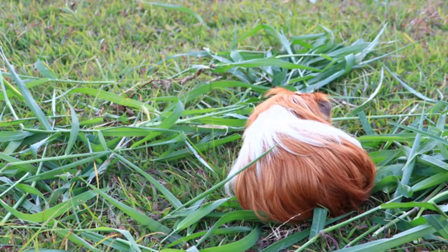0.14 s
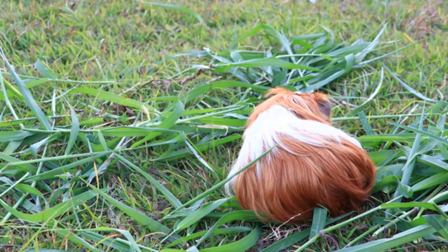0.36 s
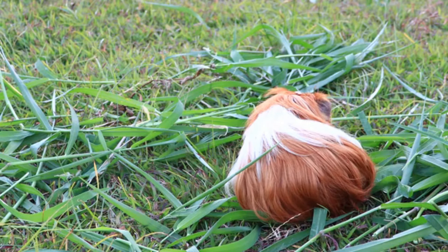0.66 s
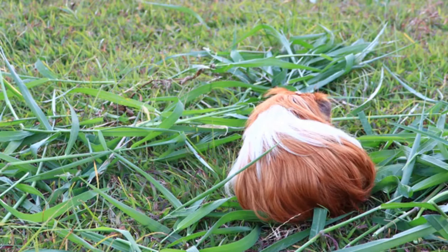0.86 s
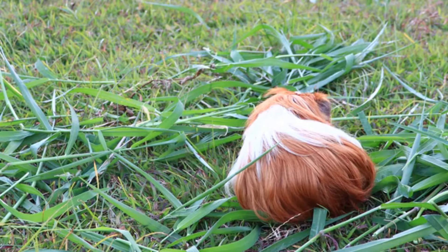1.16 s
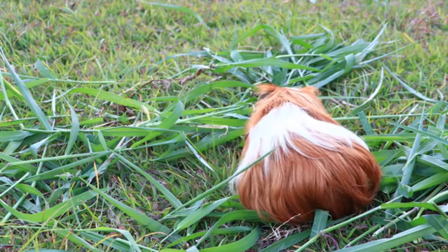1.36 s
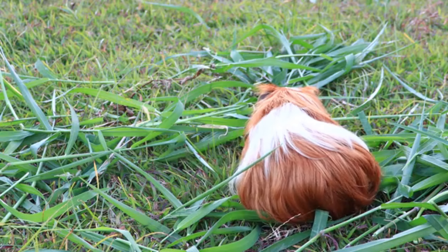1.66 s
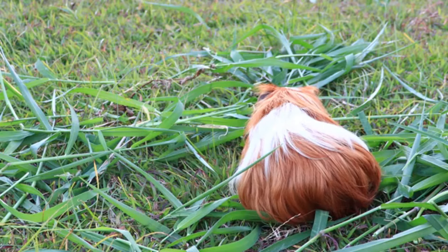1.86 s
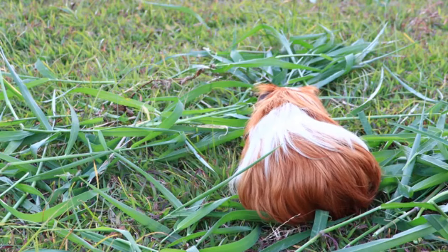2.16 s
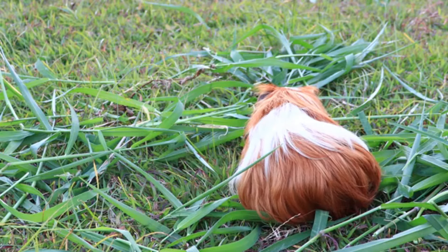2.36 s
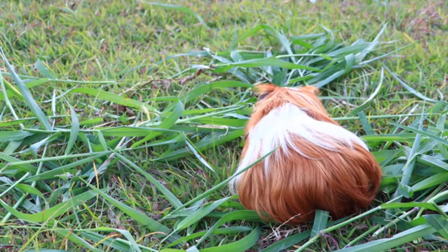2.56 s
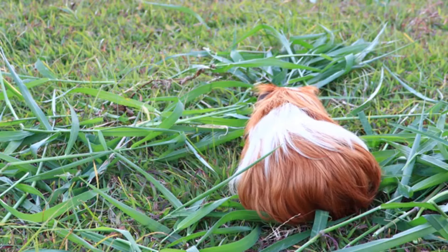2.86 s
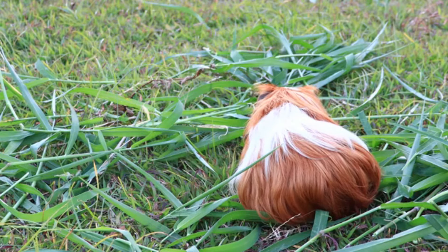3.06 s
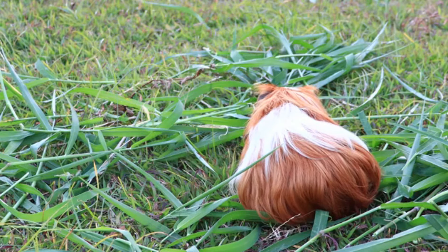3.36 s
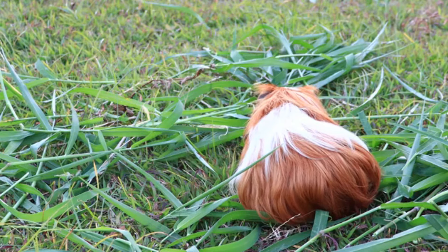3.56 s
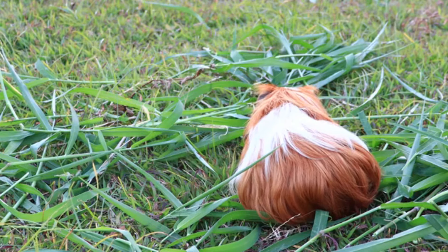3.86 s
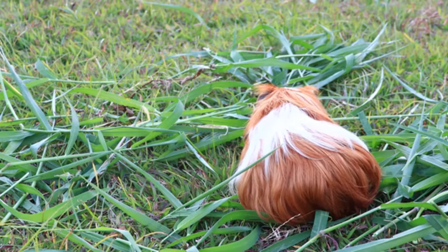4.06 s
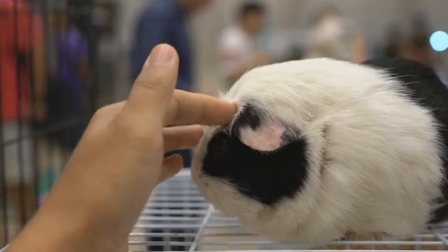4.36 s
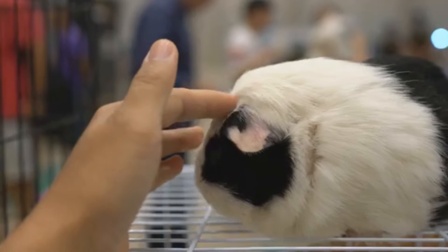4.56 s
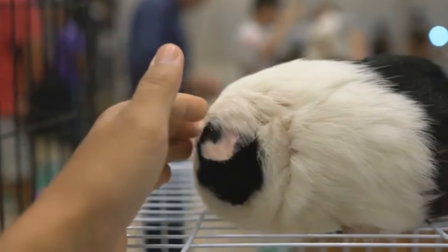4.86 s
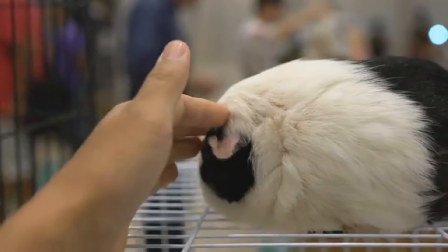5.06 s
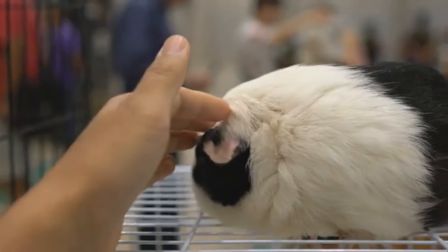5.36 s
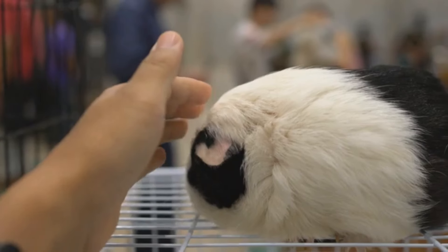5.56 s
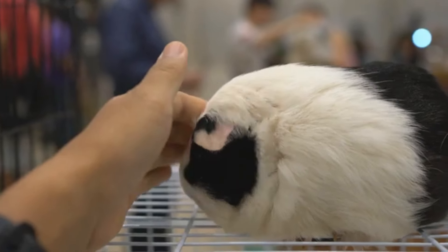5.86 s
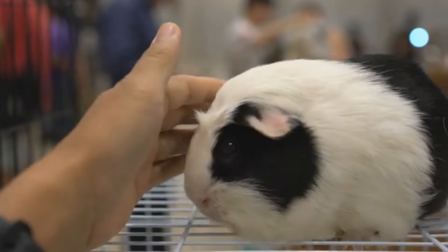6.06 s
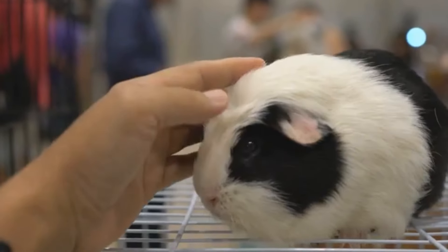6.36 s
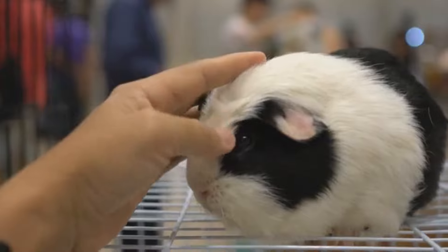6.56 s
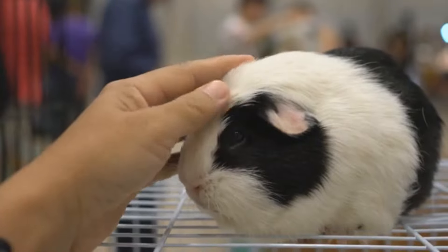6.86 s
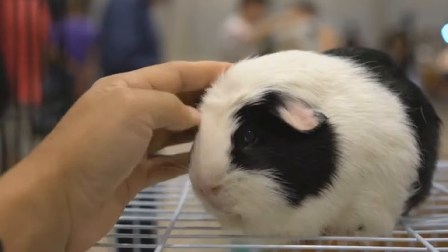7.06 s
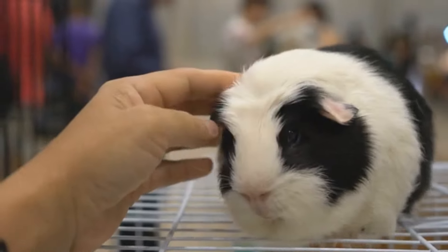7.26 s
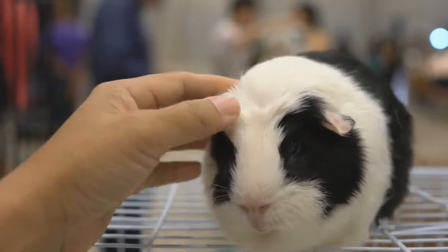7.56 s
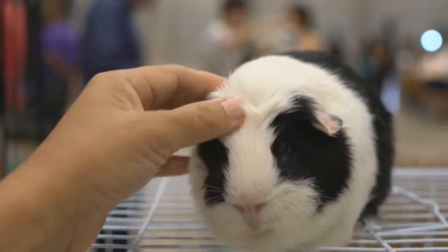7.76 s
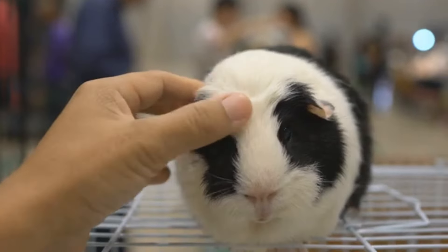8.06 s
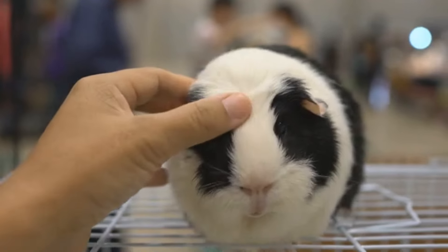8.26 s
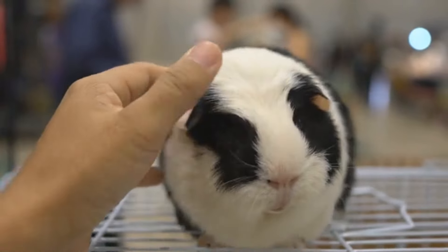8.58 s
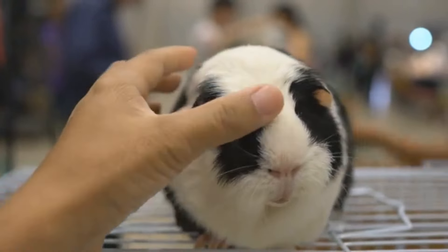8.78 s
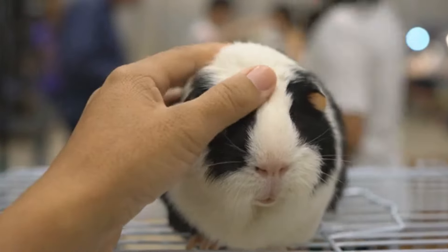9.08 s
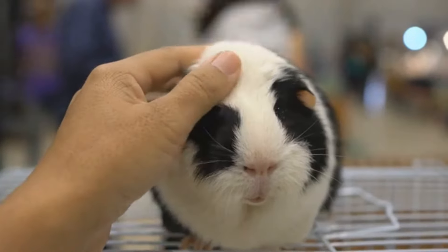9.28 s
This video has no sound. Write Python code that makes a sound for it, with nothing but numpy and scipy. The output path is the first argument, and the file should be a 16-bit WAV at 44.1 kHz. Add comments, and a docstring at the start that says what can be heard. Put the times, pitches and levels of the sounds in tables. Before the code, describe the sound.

Guinea pigs squeal close to the microphone in a small, slightly echoing room. A rapid run of shrill, rising whistles gives way to spaced squeals, the loudest slightly distorted, with soft chirps and airy puffs between them. After a brief rustle and a small knock come two more squeals, then only short, quiet chirps from farther off, over faint hiss.

```python
"""Guinea pigs wheek close to the microphone in a small live room, then settle into soft rising chirps
from farther off. Each call is one upward glide of the vocal folds through a fixed throat, breathy
while the pitch is low. The loudest wheeks overload the input. Airy rushes and a few small knocks and
rustles come between the calls; room noise, hiss and, later on, a faint mains hum lie below."""
import sys
import numpy as np
from scipy import signal
from scipy.fft import rfft, irfft, next_fast_len
from scipy.io import wavfile
from scipy.ndimage import map_coordinates

SR = 44100
rng = np.random.default_rng(int(sys.argv[2]) if len(sys.argv) > 2 else 0)


def waveform_to_disk(signal):
    """Save audio, clipped to [-1, 1], as 16-bit WAV at the path in sys.argv[1]."""
    frames = np.transpose(np.atleast_2d(signal))
    scaled = np.clip(frames, -1, 1) * 32767
    samples = np.round(scaled).astype(np.int16)
    wavfile.write(sys.argv[1], SR, samples)


N = 415422

# Colour of air passing through the throat. Each row: frequency in Hz, gain in dB.
BREATH_SPECTRUM = [(600, -34), (1200, 2), (2400, -18), (3200, -19.5), (4200, 7.5), (5300, -10.5),
                   (7000, -14), (9200, -5), (10500, -6)]
TOP_HZ = 15800  # upper limit of the harmonics and of the whole sound


def wheeks():
    """Loud whistles near the microphone, from folds held to a steady glide."""
    # Each row: start, length and time of the knee in seconds; grunt, knee and aimed-at pitch in Hz;
    # bow of the climb (+ is early); final droop in Hz; time of full effort and its hold in seconds;
    # relative grunt, full and end level in dB; overtone fall at full effort and end in dB per octave.
    calls = [ (0.0, .14, 0.075, 450, 1470, 2060, 0.063, 2, 0.044, 0.12, -43, -32, -34.5, 7.2, 20),
             (0.105, 0.27, 0.062, 520, 1274, 2795, -.1, -0.5, .15, 0.055, -41, -13, -28, 9.5, 18),
             (0.335, 0.4, 0.1, 500, 1847, 4544, 0.0037, 400.5, 0.14, 0.11, -48, -16, -22, 8.6, 11),
             (0.64, 0.32, 0.068, 700, 1753, 3890, .03, 641.5, 0.1, 0.19, -74, -22, -27, 15.3, 14),
             (0.975, 0.24, 0.039, 600, 1290, 1421, -0.0063, -3.5, 0.023, .13, -66, -54, -51.5, 6.6, 11),
             (1.15, 0.4, 0.12, 420, 1567, 4020, 0.0098, 879, .15, .232, -47, -13, -25.5, 7, 13),
             (1.47, 0.31, 0.073, 400, 2260, 4635, 0.0082, 551, 0.083, .2, -64.5, -18.5, -36, 13, 11),
             (1.785, 0.14, .06, 510, 1884, 2418, -0.046, 0.5, 0.074, 0.03, -64.5, -27, -39.5, 10, 29),
             (2.435, 0.21, 0.0049, 600, 2444, 4550, .13, 640.5, 0.023, .063, -23.5, -4.5, -14, 12, 5),
             (2.98, .208, 0.19, 410, 3055, 3100, .05, -1, 0.17, .012, -40.5, -13.5, -33.5, 12, 17),
             (3.548, .362, .121, 430, 1650, 4264, -.09, 950, .116, .2, -35.5, -12, -15, 6.4, 10),
             (4.118, 0.3, 0.12, 420, 1747, 2645, .1, 80, 0.15, .05, -42.5, -12, -29, 8.1, 24),
             (4.699, 0.18, 0.0059, 580, 3018, 4803, 0.028, 760.5, 0.0038, 0.13, -15.5, -3.5, -11.5, 9, 8),
             (6.878, .3, 0.15, 560, 1678, 2309, .01, -0.5, .14, 0.096, -29, -13.5, -25.5, 13.15, 21),
             (7.525, 0.29, 0.13, 398, 1730, 2145, 0.16, -0.5, 0.13, .055, -25.5, -13.5, -32.5, 13, 30), ]
    return call_series(calls, wheek_glide, gain_db=0.5, air_db=-22, jitter=0.004, shimmer_db=2.06,
                       overtone_db=-1.8, octave_db=4.5, rasp_db=-16.5, attack_s=.006, release_s=0.01)


def wheek_glide(t, length, knee_s, low_hz, knee_hz, aim_hz, bow, droop_hz, full_s, hold_s,
                grunt_db, full_db, end_db, full_fall, end_fall):
    """A grunt flips up to a knee in pitch, climbs on under full effort and droops as the effort ends."""
    swell_s, droop_s, tire_db_per_s, break_db = 0.083, 0.028, 1, 3
    flip_s = .1 * (knee_hz / 1678) ** .6  # higher knees take longer to reach
    flip = (knee_hz - low_hz) * ease(1 + (t - knee_s) / flip_s)
    progress = np.clip((t - knee_s) / (length - knee_s), 0, 1)
    climb = (aim_hz - knee_hz) * (progress + bow * np.sin(np.pi * progress))
    droop = droop_hz * np.exp(np.minimum(t - length, 0) / droop_s)
    pitch = grunt(knee_s - flip_s - t, low_hz) + flip + climb - droop
    stages = [full_s - swell_s, full_s, min(full_s + hold_s, length), length]
    tired_db = full_db - tire_db_per_s * hold_s
    whistle_db = np.interp(t, stages, [grunt_db + break_db, full_db, tired_db, end_db])
    fall_db = np.interp(t, [full_s, length], [full_fall, end_fall])
    return pitch, voice_break(pitch, grunt_db, whistle_db), fall_db


def chirps():
    """Short, soft calls from less steady folds."""
    # Each row: start, length and rise time in seconds, grunt and top pitch in Hz,
    # relative grunt and whistle level in dB, overtone fall in dB per octave.
    calls = [(1.974, 0.089, 0.11, 470, 1630, -56, -47, 8), (2.159, 0.15, 0.11, 488, 2220, -43, -31, 12.5),
             (2.689, 0.16, 0.097, 439.9, 2216, -61, -46.5, 9.5),
             (2.86, 0.085, 0.11, 413, 1556, -50, -42, 8.5), (3.327, 0.098, 0.12, 516, 1644, -45, -41.5, 9),
             (4.471, 0.1, 0.15, 545, 1784, -57, -54.5, 5.5), (4.88, 0.148, 0.16, 530, 1810, -75.5, -42, 20),
             (5.095, 0.074, 0.095, 445, 1442, -51.5, -46, 9.5),
             (5.192, 0.15, 0.1, 482.7, 1756, -44.5, -43, 15),
             (5.518, 0.098, 0.043, 432, 1237, -42.5, -38.5, 13),
             (5.723, 0.078, 0.06, 550, 1260, -60, -44, 6.5),
             (6.229, 0.11, 0.074, 553, 1340, -25.5, -23.5, 15.5),
             (6.559, 0.13, 0.097, 535, 1284, -30, -34, 18.5),
             (6.634, 0.086, 0.065, 527, 1303, -33, -34, 17),
             (8.011, 0.153, 0.127, 516, 1815, -27.5, -25.5, 15),
             (8.414, 0.074, 0.076, 506, 1396, -36.5, -40.5, 19.5),
             (8.671, 0.062, 0.063, 420, 1572, -37.5, -53, 19),
             (8.75, 0.11, 0.079, 510, 1473, -41.5, -46, 18),
             (9.04, 0.098, 0.067, 579.9, 1860, -31.5, -44, 18.5),
             (9.146, 0.064, 0.063, 491.9, 1278, -35.5, -40.5, 19),
             (9.375, 0.084, 0.065, 561, 1510, -35, -39, 21)]
    return call_series(calls, chirp_glide, gain_db=-0.5, air_db=-25.5, jitter=0.019, shimmer_db=3.0,
                       overtone_db=-1.0, octave_db=16, rasp_db=-16.5, attack_s=0.015, release_s=0.0031)


def chirp_glide(t, length, rise_s, low_hz, top_hz, grunt_db, whistle_db, fall_db):
    """A grunt slides up in one S-shaped rise, breaks into a whistle and fades."""
    progress = 1 + (t - length) / rise_s
    rise = (top_hz - low_hz) * ease(progress) ** 1.2  # the power makes the rise start late
    pitch = grunt(-progress * rise_s, low_hz) + rise
    fade_db = np.interp(t, [length - .02, length], [0, 9])
    return pitch, voice_break(pitch, grunt_db, whistle_db - fade_db), fall_db


def grunt(lead_s, low_hz, sag=0.18, sag_s=0.023):
    """Pitch of the slack folds, which sinks to low_hz until the rise begins in lead_s."""
    return low_hz * (1 + sag * np.clip(lead_s / sag_s, 0, 1.5) ** 1.5)


def voice_break(pitch, grunt_db, whistle_db, break_hz=1080, span_hz=400):
    """The level passes from the grunt's to the whistle's as the voice breaks."""
    return grunt_db + ease(.5 + (pitch - break_hz) / span_hz) * (whistle_db - grunt_db)


def call_series(calls, glide, gain_db, air_db, **voicing):
    """A run of calls with the breath noise that they carry."""
    voice, leak = np.zeros(N), np.zeros(N)
    for start, length, *shape in calls:
        tone, flow = vocal_folds(glide, length, shape, **voicing)
        add(voice, start, tone)
        add(leak, start, flow)
    return amp(gain_db) * voice + amp(air_db) * leak * noise(BREATH_SPECTRUM)


def vocal_folds(glide, length, shape, jitter, shimmer_db, overtone_db, octave_db, rasp_db,
                attack_s, release_s):
    """Tone and airflow of one glide: nine harmonics sweep through the throat's resonances."""
    # Response of the throat. Each row: frequency in Hz, gain in dB.
    throat = [(400, -19), (700, -21.5), (1200, -1), (1900, 1.5), (2600, -1), (3400, -10.5), (4250, -10),
              (4900, -13.5), (5800, -5.5), (7000, 1.5), (8400, -8.5), (9700, -9), (11000, -25.5)]
    t = np.arange(0, length + release_s, 1 / SR)
    n = len(t)
    pitch, level_db, fall_db = glide(t, length, *shape)
    pitch = pitch * (1 + jitter * wobble(260, n))
    phase = 2 * np.pi * np.cumsum(pitch) / SR
    pressed = np.clip(1 - fall_db / 16, 0, 1) * (pitch < 1800)
    voice = np.zeros(n)
    for k in range(1, 10):
        colour_db = along(throat, k * pitch) - fall_db * np.log2(k)
        colour_db += (k > 1) * (overtone_db + 2.5 * wobble(90, n))
        colour_db += (k == 2) * octave_db * pressed  # low, pressed notes have a strong octave
        rasp = 1 + k * amp(rasp_db) * wobble(600, n)  # uneven cycles blur the upper harmonics most
        voice += amp(colour_db) * (k * pitch < TOP_HZ) * rasp * np.sqrt(2) * np.sin(k * phase)
    gate = np.clip(t / attack_s, 0, 1) * np.clip((length + release_s - t) / release_s, 0, 1)
    drive = gate * amp(level_db + shimmer_db * wobble(150, n))
    slack = 1 / (1 + (pitch / 800) ** 4)  # loose folds at low pitch let air through
    return drive * voice, drive * slack


def rushes():
    """Unvoiced air swells and fades through the same throat."""
    # Each row: start in seconds, length in seconds, relative level in dB.
    breaths = [(2.367, 0.21, -43), (3.172, 0.25, -51.5), (3.521, 0.18, -50.5), (4.419, 0.17, -54),
               (4.61, 0.26, -51.5), (7.138, 0.23, -48), (7.51, 0.078, -61.5), (7.989, 0.08, -64.5)]
    flow = np.zeros(N)
    for start, length, db in breaths:
        add(flow, start, amp(db) * np.sqrt(np.hanning(int(length * SR))))
    return flow * (amp(-2.5) * noise(BREATH_SPECTRUM) + amp(1.5) * band(N, centre_hz=2453, octaves=0.38))


def small_noises():
    """Small dead knocks, short rustles, a low thump and two faint low drones."""
    # Each row: start in seconds, relative level in dB, band centre in Hz.
    knocks = [(5.951, -25, 2142), (6.063, -36, 2168), (8.2735, -37, 1520), (8.6342, -37, 2827)]
    # Each row: start and length in seconds, level in dB, band centre in Hz, width in octaves.
    noise_bursts = [(5.585, .04, -53, 9000, .25), (5.705, .07, -46, 8800, .25), (5.74, .24, -59, 8800, .3),
                    (5.962, .17, -53, 40, .6), (5.964, .085, -47, 2300, .22), (8.38, .48, -63, 385, .1),
                    (8.99, .11, -63, 250, .08)]
    track = np.zeros(N)
    t = np.arange(SR // 20) / SR
    knock_t60 = 0.019
    for start, db, hz in knocks:
        add(track, start, amp(db - 7.0 - 60 * t / knock_t60) * band(len(t), hz, octaves=0.7))
    for start, length, db, hz, octaves in noise_bursts:
        progress = np.linspace(0, 1, int(length * SR))
        envelope = np.minimum(progress / 0.13, 1) * np.sqrt(1 - progress)
        add(track, start, amp(db) * envelope * band(len(progress), hz, octaves))
    return track


def room(x, early_db, early_t60, late_db, side_db):
    """Near walls smear each glide; a weaker tail follows, each frequency dying at its own speed."""
    # Each row: frequency in Hz, time for the tail to fall 60 dB in seconds.
    decay_times = [(300, .25), (1200, .36), (2400, .42), (4200, .3), (7000, .28), (10000, .22)]
    hz, t, spectra = signal.stft(rng.standard_normal((2, SR * 2 // 3)), SR, nperseg=256)
    late = signal.istft(spectra * amp(-60 * t / along(decay_times, hz)[:, None]), SR, nperseg=256)[1]
    early = rng.standard_normal(late.shape) * amp(-60 * np.arange(late.shape[1]) / SR / early_t60)
    tails = amp(early_db) * early / np.linalg.norm(early[0])
    tails += amp(late_db) * late / np.linalg.norm(late[0])
    tails = np.pad(tails, ((0, 0), (SR // 400, 0)))  # the first reflection arrives after 2.5 ms
    mid, side = signal.fftconvolve(x[None], tails, axes=1)[:, :N]
    return mid + amp(side_db) * side * [[1], [-1]]


def room_tone():
    """Low room noise that swells unevenly under a drifting hiss, both mostly in the centre."""
    # Colours of the two noises. Each row: frequency in Hz, gain in dB.
    murk_spectrum = [(88, -46.5), (150, -17.5), (354, -6), (463, -9.5), (900, -1), (991, -6.5),
                     (1500, -5.5), (1950, -27.5), (3300, -120)]
    hiss_spectrum = [(530, -38.5), (900, -18.5), (1010, -18), (1820, -5.5), (2360, 2.5), (4660, -5.5),
                     (6940, -9), (9600, -6.5), (11000, -39), (14300, -79), (22000, -120)]
    # Their rise and fall. Each row: time in seconds, relative level in dB.
    murk_levels = [(0, -90.5), (2.2, -86.5), (3.5, -68.5), (4.1, -88.5), (5.45, -70), (5.65, -60),
                   (7.3, -67), (9.42, -59.5)]
    hiss_levels = [(0, -51.5), (1.1, -67.5), (2.1, -66), (2.8, -58.5), (3.5, -59.5), (4.08, -62.5),
                   (4.6, -56.5), (5.45, -66), (5.65, -63.5), (9.42, -66.5)]
    murk = amp(timeline(murk_levels) + 1.5 * wobble(7.8, N))
    hiss = amp(timeline(hiss_levels) - 1.0)
    mid, side = (murk * noise(murk_spectrum) + hiss * noise(hiss_spectrum) for _ in range(2))
    return mid + amp(-11) * side * [[1], [-1]]


def mains_hum(hz=119):
    """A faint, wavering mains tone that comes in past the halfway point."""
    # Each row: time in seconds, relative level in dB.
    hum_levels = [(5.55, -120), (5.65, -77), (9.42, -74.5)]
    waver_db = 2.5 * wobble(4, N)
    tone = unit(np.sin(2 * np.pi * hz * np.arange(N) / SR))
    return amp(timeline(hum_levels) + waver_db - 2.0) * tone


def amp(db):
    """Decibels to gain."""
    return 10 ** (np.asarray(db) / 20)


def unit(x):
    """Scaled to rms 1."""
    return x / np.sqrt(np.mean(x ** 2) + 1e-20)


def ease(u):
    """A smooth step from 0 to 1."""
    u = np.clip(u, 0, 1)
    return u * u * (3 - 2 * u)


def along(points, hz):
    """(Hz, value) points read on a log axis."""
    freqs, values = np.transpose(points)
    return np.interp(np.log(hz + 1), np.log(freqs + 1), values)


def timeline(points):
    """(Seconds, value) points read at every sample."""
    return np.interp(np.arange(N) / SR, *np.transpose(points))


def wobble(rate, n):
    """A smooth random curve of n samples, rate knots a second."""
    return map_coordinates(rng.standard_normal(int(n * rate / SR) + 4), [np.arange(n) * rate / SR])


def filtered(x, response):
    """x through a filter given as a function of frequency."""
    n = x.shape[-1]
    padded = next_fast_len(n + 8192)
    return irfft(rfft(x, padded) * response(np.fft.rfftfreq(padded, 1 / SR)), padded)[..., :n]


def noise(spectrum):
    """Noise of rms 1 with the given colour."""
    return unit(filtered(rng.standard_normal(N), lambda hz: amp(along(spectrum, hz))))


def band(n, centre_hz, octaves):
    """n samples of noise in a bell-shaped band, rms 1."""
    bell = lambda hz: np.exp(-.5 * (np.log2((hz + 1) / centre_hz) / octaves) ** 2)
    return unit(filtered(rng.standard_normal(n), bell))


def add(track, start_s, x):
    """Mix x into the track from start_s on."""
    i = max(round(start_s * SR), 0)
    track[i:i + len(x)] += x[:len(track[i:])]


def scene():
    """Animals in a small room; the chirps come from farther off, so they carry more of the walls."""
    loud, far = wheeks(), chirps()
    near = loud + rushes() + small_noises()
    walls = room(near + amp(4.5) * far, early_db=-12.5, early_t60=.14, late_db=-20.5, side_db=-2.5)
    return near + far + walls + room_tone() + mains_hum()


def record(dry):
    """The sound is cut off sharply above 10 kHz, then overloads: both channels' peaks flatten together."""
    treble_cut_hz, ceiling, low_cut_hz = 10100, .39, 150
    heard = filtered(dry, lambda hz: 1 / np.sqrt(1 + (hz / treble_cut_hz) ** 80))
    clipped = heard / (1 + np.abs(heard.mean(axis=0) / ceiling) ** 24) ** (1 / 24)
    return filtered(clipped, lambda hz: (hz < TOP_HZ) * 1j * hz / (low_cut_hz + 1j * hz))


dry = scene()
out = record(dry)
waveform_to_disk(out)
```